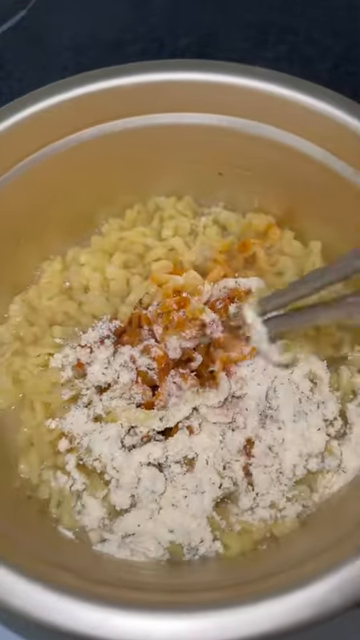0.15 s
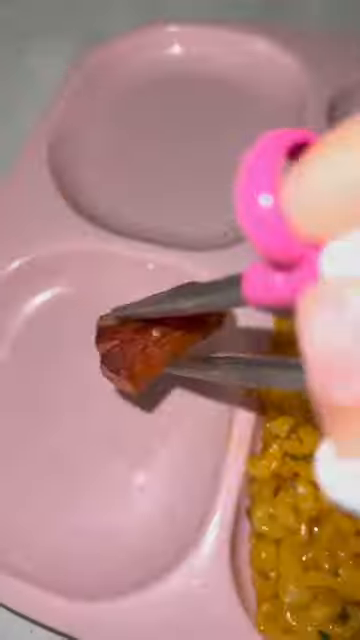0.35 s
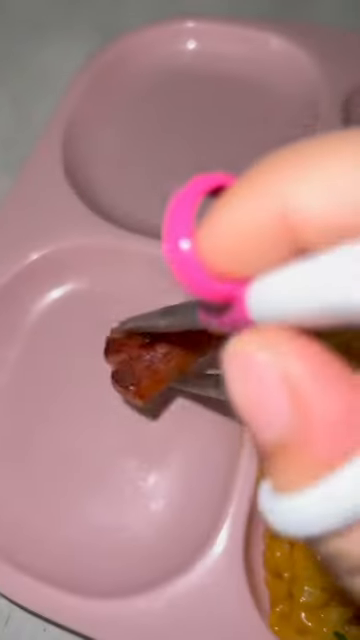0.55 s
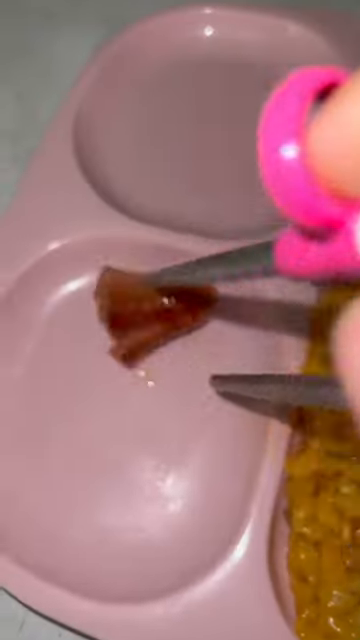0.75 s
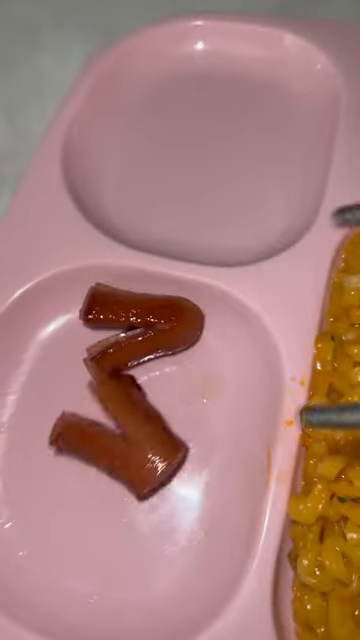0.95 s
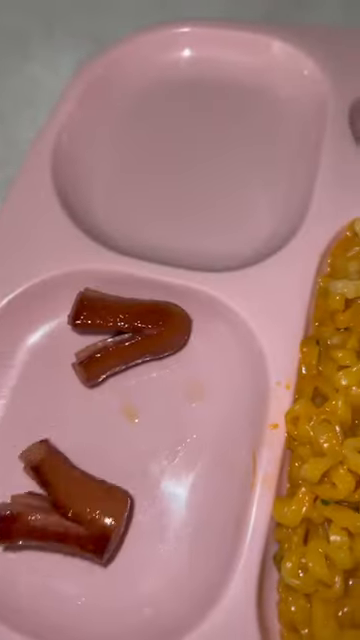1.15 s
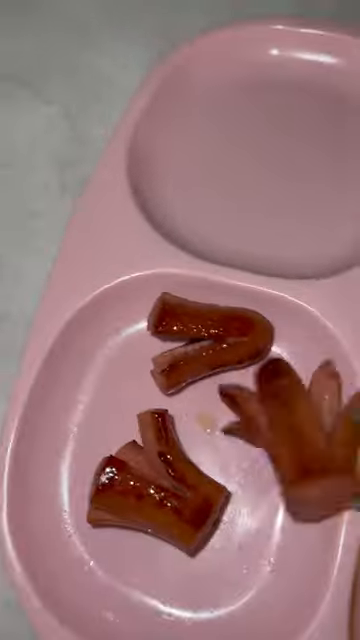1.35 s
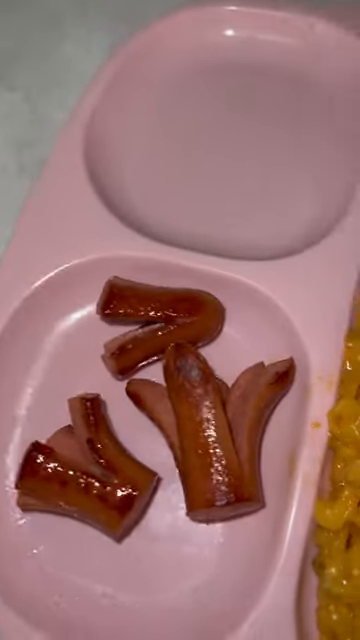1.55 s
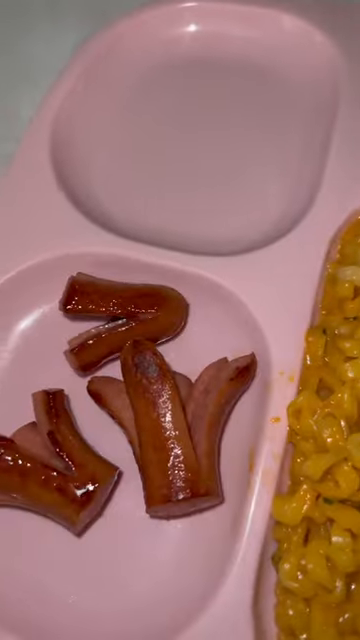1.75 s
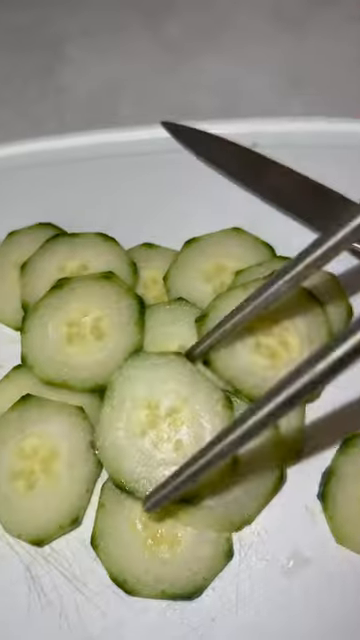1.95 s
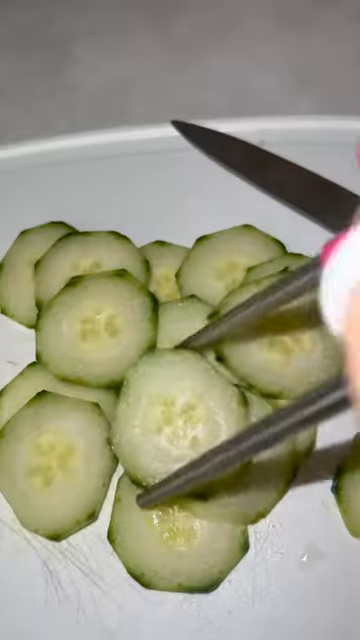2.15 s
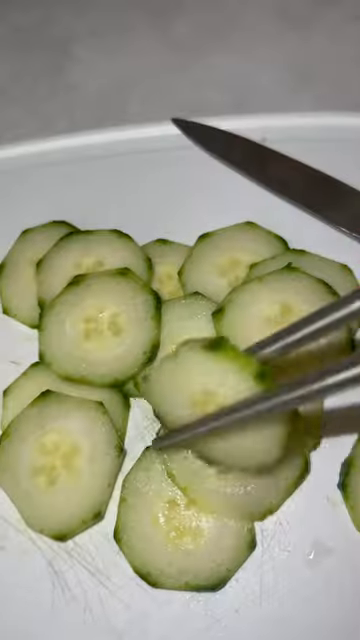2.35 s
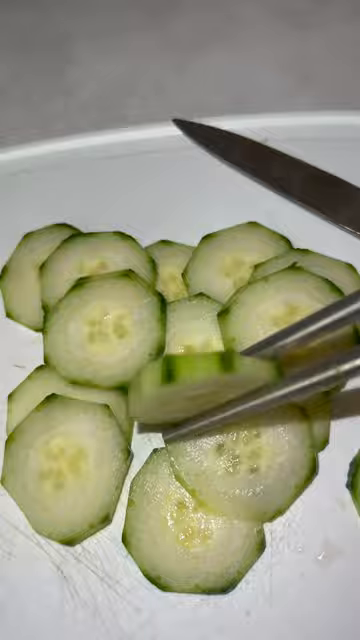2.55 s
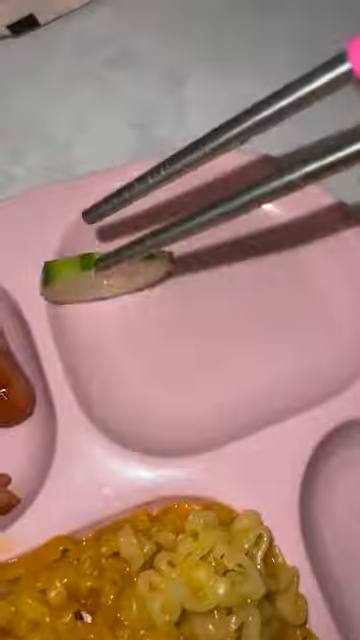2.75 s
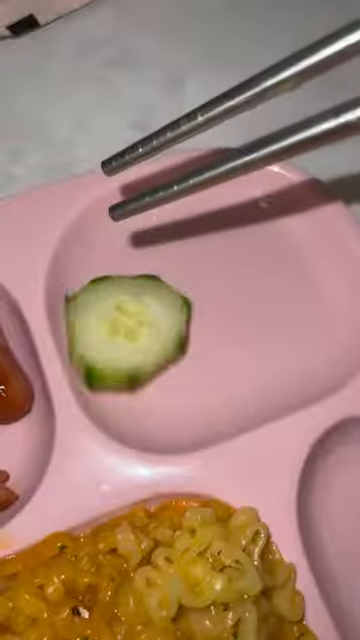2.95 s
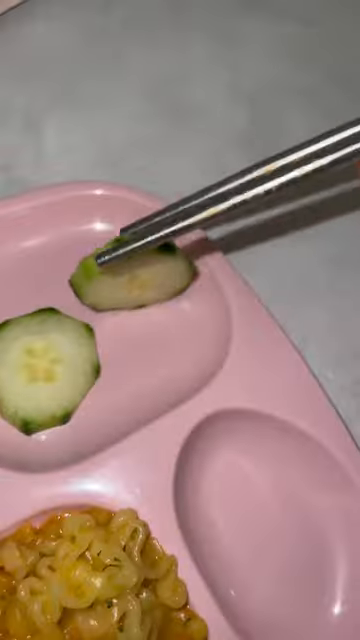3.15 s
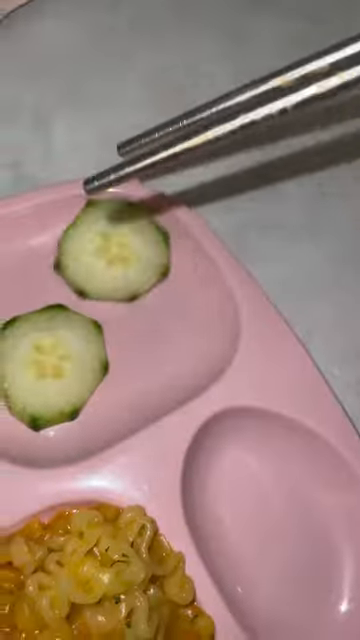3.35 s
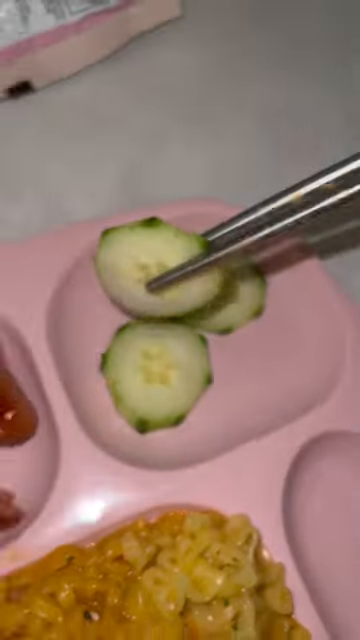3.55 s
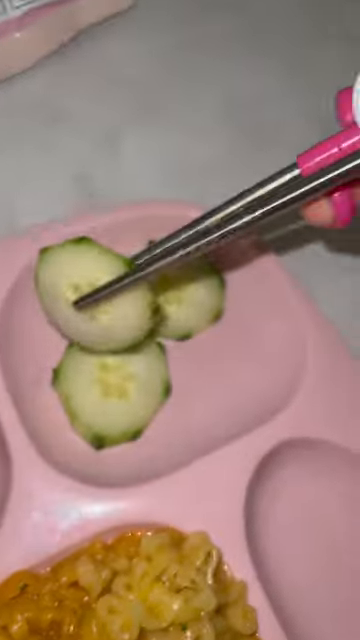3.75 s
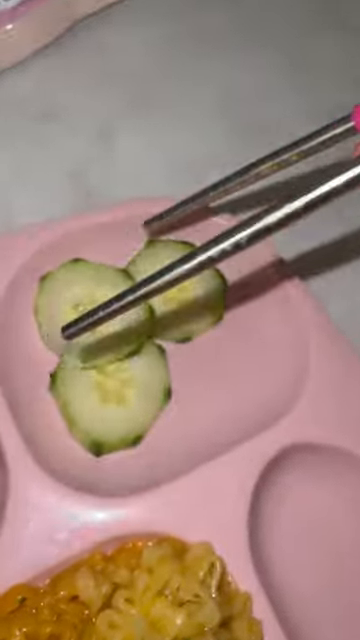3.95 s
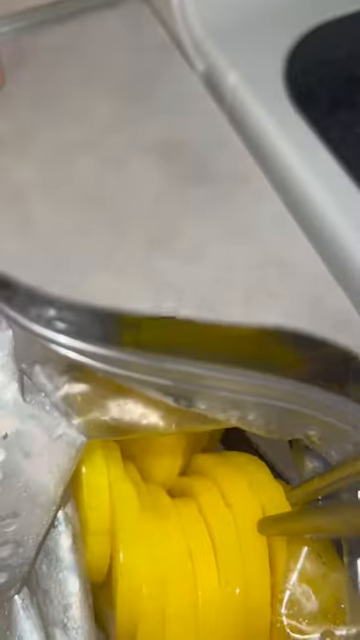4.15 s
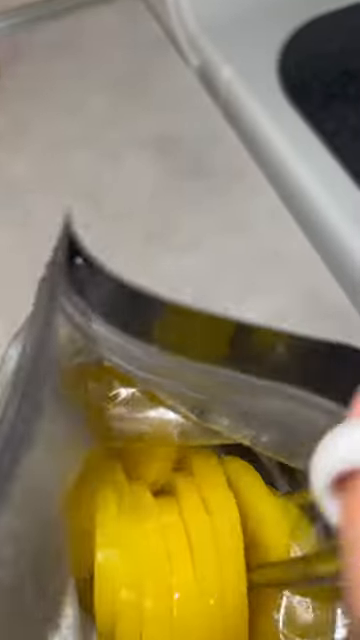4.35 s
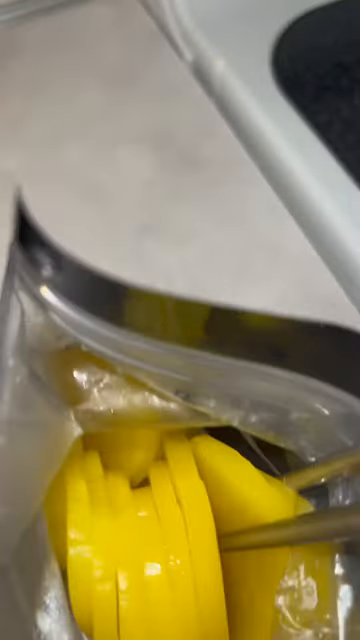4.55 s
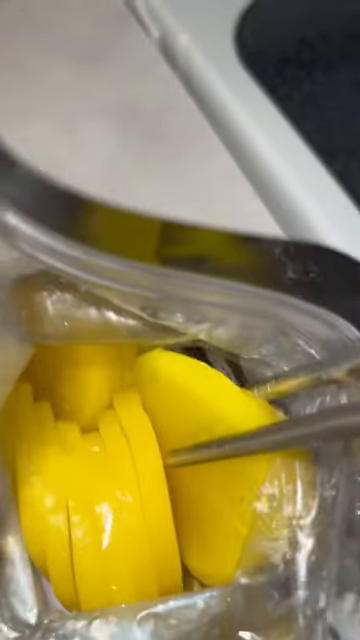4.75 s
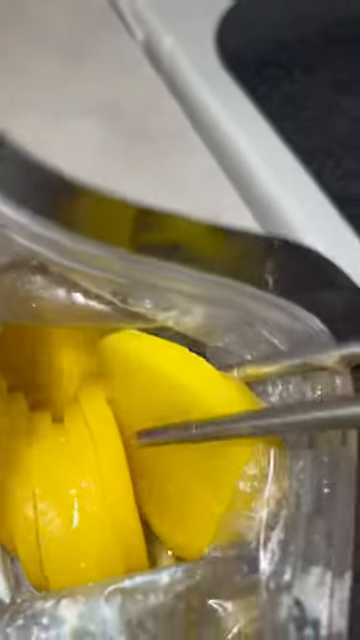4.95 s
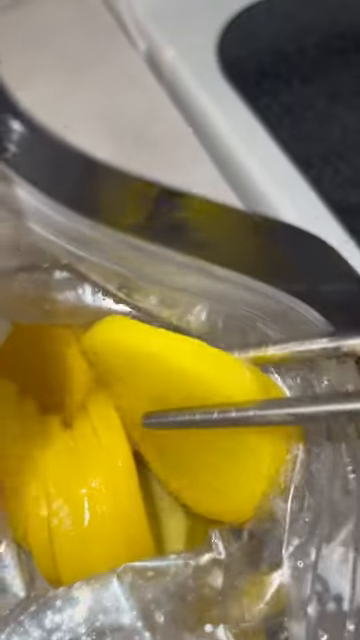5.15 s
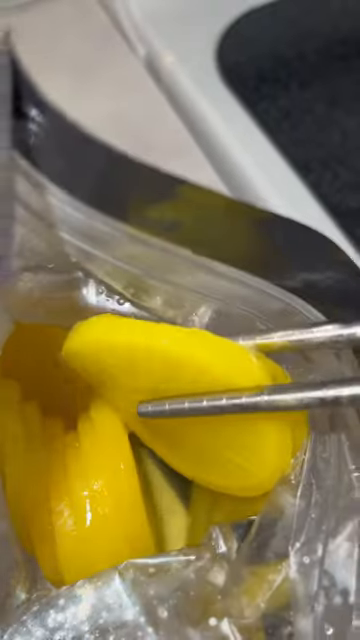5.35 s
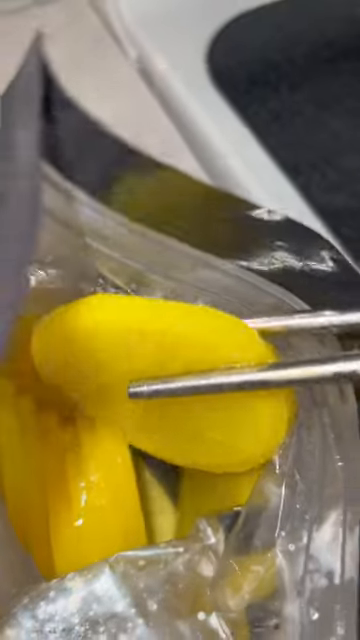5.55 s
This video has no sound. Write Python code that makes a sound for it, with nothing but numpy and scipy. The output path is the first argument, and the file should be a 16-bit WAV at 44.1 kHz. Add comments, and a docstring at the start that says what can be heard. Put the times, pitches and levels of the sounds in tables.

```python
"""A quiet home kitchen: food is plated close to the microphone, over a low rumble; an appliance hums at first.
Chopsticks, sausage and cucumber knock on a plastic tray (noise bursts through tray resonances), click wetly,
slide (smooth band noise) and thump the counter (decaying sines). Then the chopsticks dig pickled radish
out of a foil pouch: showers of foil clicks, single snaps, wet pops and low handling noise.
Hums are noise plus wavering sines; echoes and a diffuse tail make the room."""
import sys
import numpy as np
from scipy import signal
from scipy.fft import rfft, irfft, next_fast_len
from scipy.io import wavfile
from scipy.ndimage import uniform_filter1d

SR = 44100
rng = np.random.default_rng(int(sys.argv[2]) if len(sys.argv) > 2 else 0)


def pcm_store(signal):
    """Save signal as 16-bit PCM."""
    levels = np.round(np.clip(np.atleast_2d(signal), -1, 1) * 32767)
    wavfile.write(sys.argv[1], SR, levels.astype(np.int16).T)


N = 250929

# All event levels are relative, ahead of the mix gains in scene().
# Knocks on the tray. Each row: start in seconds, peak in dB, hardness as a tilt in dB per octave,
# delay of the bounce in seconds (0: lands dead).
KNOCKS = [(0.6363, -38, 1.5, .020), (0.7044, -48.5, 5.5, 0), (0.795, -50, 5.5, 0.026),
          (0.9765, -44, 7, 0.023), (1.0546, -53, 17, 0), (1.3485, -41, -5.5, .019),
          (2.7522, -56, -14, 0.00016), (2.856, -59.5, -12, 0.0002), (2.9856, -8.5, 2, .039),
          (3.168, -39.5, 5, .033), (3.3316, -44.5, -10.5, 0.00046), (3.3536, -24.5, -1.5, 0.0028),
          (3.3883, -45, -4, .011), (3.4165, -39.5, 7, .0095), (3.892, -37, -5, 0.003)]
# Clicks of chopsticks: mostly wet clicks into food; the rows at 0.6372 s and 3.892 s are steel tips striking
# the tray. # Each row: start in seconds, peak in dB, centre of the boosted pitch in Hz, t60 of the squish in
# seconds.
CLICKS = [(0.0109, -43.5, 6300, 0.13), (.2981, -52.5, 5800, 0.04), (0.4475, -44.5, 2380, 0.033),
          (0.6372, -39, 5150, 0.039), (1.3468, -36, 1720, 0.26), (2.3047, -29, 2270, 0.14),
          (2.3152, -32, 2000, 0.099), (2.348, -48.5, 1500, 0.11), (3.6163, -54, 2832, .06),
          (3.892, -38.5, 5940, .025), (4.1632, -52, 1760, 0.25)]
# Weight landing on the counter. Each row: start in seconds, peak in dB, pitch in Hz.
THUMPS = [(0.648, -37, 108.5), (1.362, -42.5, 81.7), (2.152, -48, 120), (2.321, -45.5, 165),
          (2.759, -43.5, 127.4), (3.003, -37.5, 118.4), (3.15, -38, 112), (3.173, -29.5, 109.1),
          (3.332, -46, 187), (3.356, -34, 132.4), (3.389, -44.5, 220), (3.42, -31.5, 115.8),
          (3.893, -40, 115.3), (4.263, -33, 100.4), (4.334, -35.5, 73), (4.916, -39.5, 100.3),
          (5.172, -39.5, 91), (5.265, -40, 66.2)]
# Large pouch folds snapping over. Each row: start in seconds, peak in dB.
SNAPS = [(4.2853, -8), (4.295, -18), (4.3215, -15), (4.3285, -14.5), (4.405, -20.5), (4.4943, -13),
         (4.5184, -21), (4.561, -17), (4.571, -11.5), (4.6824, -29), (4.7571, -8), (4.7603, -14.5),
         (4.7869, -13), (4.9, -26.5), (4.9136, -23), (5.048, -25.5), (5.1295, -24), (5.238, -35),
         (5.3946, -35.5), (5.668, -27.5)]
# Tray resonances. Each row: centre in Hz, nominal width in Hz, level in dB.
TRAY_MODES = [(280.5, 79, -19.5), (570, 50, -27), (949, 32, 0), (1006.5, 87, 3), (1290, 170, -10),
              (1520, 170, -9.5), (1760, 240, -17), (2174, 210, -9), (2700, 260, -16), (2975, 200, -28.5),
              (3755, 180, -28.5), (4500, 250, -35)]
# Soft noise swells: food and chopsticks sliding, the shortest being slices flopping over; the row at 2.262 s
# is only a faint hiss around a wet click. Each row: start in seconds, length in seconds, rms in dB,
# geometric centre in Hz, bandwidth in Hz.
SWELLS = [(0.547, 0.096, -74, 780, 150), (0.627, 0.06, -58.5, 1210, 1020), (0.869, 0.067, -75, 1550, 2050),
          (1.446, 0.081, -73.5, 2260, 3280), (1.94, 0.11, -71, 570, 184), (2.262, 0.14, -72, 2800, 6150),
          (2.388, 0.077, -75, 2440, 4030), (3.152, 0.092, -58, 583, 120), (3.329, 0.013, -49.5, 730, 670),
          (3.347, 0.03, -41.5, 530, 540), (3.387, 0.022, -45.5, 660, 535), (3.413, 0.025, -45.5, 730, 760)]
# Steel chopsticks touching and ringing. Each row: start in seconds, initial amplitude in dB, pitch in Hz,
# t60 in seconds.
TINKS = [(0.0094, -34.5, 5960, 0.009), (0.2986, -41, 5970, 0.0057), (0.448, -60, 2550, 0.032),
         (3.6129, -50.5, 2854, 0.021)]
# Wet radish slices smacking apart. Each row: start in seconds, peak in dB, pitch in Hz.
SMACKS = [(4.2499, -23.5, 1290), (4.49, -26.5, 2340), (4.7322, -32.5, 1700), (4.7938, -31, 1850),
          (4.9251, -25, 1390), (5.44, -40, 1580), (5.511, -34, 1580), (5.5749, -39.5, 1910)]
# Pushes of the chopsticks into the pouch. Each row: start in seconds, attack in seconds, hold in seconds,
# release t60 in seconds, effort in dB, rubbing on dry foil in dB re effort.
PUSHES = [(4.197, 0.052, 0.055, 0.31, -35, -4), (4.473, 0.045, 0.078, 0.31, -41, -12),
          (4.67, 0.05, 0.065, 0.31, -47, -4), (4.896, 0.0097, 0.012, .17, -46.5, -6),
          (4.963, 0.19, 0.033, 0.1, -44, -2), (5.23, 0.0052, 0.0027, 0.038, -42.5, -0.5),
          (5.384, 0.069, 0.13, .25, -61, -26), (5.641, 0.0055, 0.065, .2, -39, 1)]
# Spectra of contact ticks, squish, foil and pouch handling. Each row: frequency in Hz, level in dB.
TICK_SPECTRUM = [(500, -12.5), (2000, -1.5), (4000, 2), (6000, -8.5), (8000, -2), (11000, -9), (16000, -25)]
SQUISH_SPECTRUM = [(150, -13), (300, 5), (700, -7), (1000, -2), (1700, -8.5), (2600, -7.5), (4200, -12.5),
                   (7000, -12.5), (12000, -7.5), (16000, -24)]
FOIL_SPECTRUM = [(100, -36), (300, 2), (600, -4.5), (900, -4.5), (1500, 1.5), (2200, -0.5), (3900, -3.5),
                 (5700, -2), (9000, -4.5), (11500, -5.5), (14500, -11.5), (16500, -9)]
HANDLING_SPECTRUM = [(15, -42), (25, -15.5), (43, 6.5), (64, 6), (140, -2), (259, -4), (297, -10.5),
                     (533, -21.5), (900, -22), (1170, -27), (1980, -120)]
# Spectra of room rumble, fan air and whir air. Each row: frequency in Hz, level in dB.
RUMBLE_SPECTRUM = [(12, -38.5), (20, -29.5), (45, 0.5), (71, -4), (121, -6.5), (169, -29), (332, -24.5),
                   (420, -32.5), (566, -44), (794, -47), (939, -41), (1600, -48.5), (2810, -50.5),
                   (8170, -58.5), (12000, -62.5), (16500, -88.5)]
FAN_SPECTRUM = [(59, -30), (100, -22.5), (129, -5), (200, -13), (399, -14), (513, -20), (558, -15.5),
                (733, -28), (2320, -42.5), (3050, -48), (5370, -47.5), (11400, -64.5), (15000, -79)]
WHIR_SPECTRUM = [(150, 6.5), (280, -1.5), (350, 8), (500, -15.5), (800, -22.5), (1500, -33.5), (3200, -35),
                 (4500, -18.5), (6500, -31.5), (8200, -25.5), (10000, -48)]
# Hum lines of the fan and of a second, fainter whir. Each row: frequency in Hz, rms in dB before the gain below.
FAN_LINES = [(122, -51.5), (275, -65.5), (402, -61), (560, -59.5)]
WHIR_LINES = [(335, -55.5)]
# Gain of each hum over time. Each row: time in seconds, gain in dB.
FAN_GAIN = [(0, 0), (.345, 0), (.36, -58.5)]
WHIR_GAIN = [(.34, -39), (.36, -19), (.52, -14), (.58, -6), (.84, -4), (.88, -8.5), (.92, -50), (1.0, -63)]
# Decay of the kitchen tail. Each row: frequency in Hz, t60 in seconds.
KITCHEN_T60 = [(120, 1), (500, 0.65), (1200, 0.25), (3000, 0.47), (8000, 0.47), (16000, 0.1)]
# Initial colour of the kitchen tail. Each row: frequency in Hz, level in dB.
KITCHEN_SPECTRUM = [(100, -6.5), (500, 10.5), (1000, 7.5), (1500, 6), (2300, 4), (3200, 7.5), (5000, 3),
                    (16000, -4.5)]
# Reflections from counter and cupboards. Each row: delay in seconds, linear gain.
ECHOES = [(.0024, 0.085), (.0075, .07), (0.0129, 0.046), (0.0148, 0.035), (.0255, .075), (.030, 0.057)]

# a bounce moves this share of the way to the elastic level, and comes back sharper
ELASTIC_DB, BOUNCE_SHARE, BOUNCE_TILT_DB_PER_OCT = -54, .4, 2.5
# light skitter as the chopsticks let go of the sausage
SKITTER_START_S, SKITTER_END_S, SKITTER_DB, SKITTER_HARDNESS_DB_PER_OCT = 0.9, .95, -64.5, -2
GRIP_DB = -13.5  # a push catches this far below full effort, then builds
# the pouch rocks after each push: lag, dB of rumble per dB of effort, level where both are equal
ROCK_LAG_S, ROCK_DB_PER_DB, ROCK_DB = 0.0085, 0.78, -46.5
# a stronger snap is brighter: tilt in dB per octave per dB; at the plain level it has the foil's own colour
SNAP_TILT_PER_DB, SNAP_PLAIN_DB = 0.38, -17
RUMBLE_DB = -55.5
LOW_CUT_HZ, EDGE_HZ = 40.5, 16400


def amp(db):
    """Decibels to gain."""
    return 10 ** (np.asarray(db) / 20)


def unit(x):
    """Scales to rms 1."""
    return x / np.sqrt(np.mean(x ** 2) + 1e-20)


def peaked(x):
    """Scales to peak 1."""
    return x / (abs(x).max() + 1e-20)


def read(points, hz):
    """Interpolates a table on a log-frequency axis."""
    f, value = np.transpose(points)
    return np.interp(np.log(hz + 1), np.log(f + 1), value)


def follow(rows):
    """Turns rows (s, dB, ..) into one gain curve per dB column."""
    s, *columns = np.transpose(rows)
    return [amp(np.interp(np.arange(N) / SR, s, c)) for c in columns]


def add(mix, s, sound):
    """Mixes a sound in at time s."""
    part = mix[..., max(round(s * SR), 0):][..., :sound.shape[-1]]
    part += sound[..., :part.shape[-1]]


def noise(spectrum):
    """Gaussian noise coloured in the frequency domain, rms 1."""
    n = next_fast_len(N)
    white = rfft(rng.standard_normal(n))
    gain = amp(read(spectrum, np.fft.rfftfreq(n, 1 / SR)))
    return unit(irfft(white * gain, n)[:N])


def impulse(gain_db):
    """Minimum phase: the sharpest causal click with this spectrum."""
    log_gain = np.log(amp(np.r_[gain_db, gain_db[-2:0:-1]]))
    return np.fft.ifft(np.exp(np.conj(signal.hilbert(log_gain)))).real


def ports(x, right_db, delay=2):
    """Two microphone ports: the left hears the signal or pair some samples later; right_db sets the balance."""
    left, right = np.broadcast_to(x, (2, x.shape[-1]))
    late = np.r_[np.zeros(delay), left[:-delay]]
    return np.array([late / amp(right_db / 2), right * amp(right_db / 2)])


def sway(hz):
    """Slow random wander of rms 1, with hz fresh values a second."""
    t = np.arange(N) / SR
    return unit(np.interp(t * hz, np.arange(512), rng.standard_normal(size=512)))


def burst(t, t60_s, spill):
    """A sharp edge and the dying scatter of micro-contacts after it."""
    scatter = rng.standard_normal(len(t)) * amp(-60 * t / t60_s)
    return (t == 0) + spill * scatter / np.linalg.norm(scatter)


def shower(per_s, spread_db):
    """Clicks at random moments, most faint, a few loud."""
    where, size = rng.random(size=(4096, 2))[:round(per_s * N / SR)].T
    train = np.zeros(N)
    train[(where * N).astype(int)] = amp(spread_db * np.minimum(-np.log(size), 2.5))
    return train


def contacts(count=6):
    """Every tray touch as (s, peak dB, hardness): knocks, their bounces and the skitter."""
    touches = [(s, db, hardness) for s, db, hardness, gap_s in KNOCKS]
    for s, db, hardness, gap_s in KNOCKS:
        if gap_s > 0:
            bounce_db = db - BOUNCE_SHARE * (db - ELASTIC_DB)
            touches.append((s + gap_s, bounce_db, hardness + BOUNCE_TILT_DB_PER_OCT))
    steps = (np.arange(count) + rng.random(size=count)) / count
    for s in SKITTER_START_S + (SKITTER_END_S - SKITTER_START_S) * steps:
        touches.append((s, SKITTER_DB, SKITTER_HARDNESS_DB_PER_OCT))
    return touches


def tray(tick_db=-19, tick_per_tilt=0.4, strike_db=2.6, scatter_db=0.5, chatter_t60_s=0.017, chatter=0.46,
         rise_s=0.0032, dull_hz=3700, lean_hz=580):
    """Knocks chatter on the tray, whose modes share each one at random; harder contacts tick more."""
    out, t, hz = np.zeros(N), np.arange(SR // 5) / SR, np.fft.rfftfreq(4096, 1 / SR)
    octaves = np.log2(np.clip(hz, 300, 4000) / 1000)
    skirts_db = -10 * np.log10((1 + (hz / dull_hz) ** 6) * (1 + (lean_hz / (hz + 1)) ** 4))
    for s, db, hardness in contacts():
        shares = amp(strike_db * rng.standard_normal(len(TRAY_MODES)))  # where it lands
        power = 0
        for share, (f, width, level) in zip(shares, TRAY_MODES):
            power = power + (share * amp(level)) ** 2 / (1 + (2 * (hz - f) / width) ** 2) ** 0.86
        # the many weaker modes
        ripple_db = scatter_db * unit(uniform_filter1d(rng.standard_normal(len(hz)), size=7))
        body = impulse(10 * np.log10(power) + skirts_db + hardness * octaves + ripple_db)
        ring = signal.fftconvolve(burst(t, chatter_t60_s, chatter), body)[:len(t)]
        ring = peaked(ring * (1 - np.exp(-t / rise_s)))
        tick_burst = burst(t, t60_s=0.022, spill=4.5)
        tick = peaked(signal.fftconvolve(tick_burst, impulse(read(TICK_SPECTRUM, hz)))[:len(t)])
        add(out, s, amp(db) * (ring + amp(tick_db + tick_per_tilt * hardness) * tick))
    return out


def food(ring_db=7, ring_octaves=0.74, spill=1.5):
    """Chopstick clicks, mostly into moist food: two noise bursts through a squish spectrum boosted at one
    pitch."""
    out, t, hz = np.zeros(N), np.arange(SR // 4) / SR, np.fft.rfftfreq(1024, 1 / SR)
    for s, db, pitch_hz, t60_s in CLICKS:
        boost_db = ring_db * np.exp(-(np.log2((hz + 1) / pitch_hz) / ring_octaves) ** 2)
        contact = burst(t, t60_s, spill) + burst(t, t60_s=0.02, spill=2.5)
        click = signal.fftconvolve(contact, impulse(read(SQUISH_SPECTRUM, hz) + boost_db))
        add(out, s, amp(db) * peaked(click))
    return out


def steel():
    """Thin steel rods ring briefly on one bending mode."""
    out, t = np.zeros(N), np.arange(SR // 8) / SR
    for s, db, hz, t60_s in TINKS:
        add(out, s, amp(db - 60 * t / t60_s) * np.sin(2 * np.pi * hz * t))
    return out


def swells():
    """Smooth band-passed noise that swells and fades."""
    out = np.zeros(N)
    for s, length_s, db, hz, width_hz in SWELLS:
        low_hz = np.hypot(hz, width_hz / 2) - width_hz / 2
        band = signal.butter(2, [low_hz, low_hz + width_hz], "band", fs=SR, output="sos")
        hiss = signal.sosfilt(band, rng.standard_normal(SR // 4))[:round(length_s * SR)]
        u = np.linspace(0, 1, len(hiss))
        add(out, s, amp(db) * unit(hiss * np.sqrt(u) * (1 - u)))
    return out


def counter(t60_s=0.25, rise_s=0.0016, low_db=-9, low_ratio=.55, high_db=-13, high_ratio=2.4, high_t60_s=0.14):
    """The counter booms under each landing weight: three decaying partials."""
    out, t = np.zeros(N), np.arange(SR // 2) / SR
    for s, db, hz in THUMPS:
        turn = 2 * np.pi * hz * t
        boom = (np.sin(turn) + amp(low_db) * np.sin(low_ratio * turn)) * amp(-60 * t / t60_s)
        boom += np.sin(high_ratio * turn) * amp(high_db - 60 * t / high_t60_s)
        add(out, s, amp(db) * peaked(boom * (1 - np.exp(-t / rise_s))))
    return out


def facet(tilt_db, t60_s, spill, uneven_db=4.0, port_db=6.5, knee_hz=1900, thin=0.28):
    """One foil facet buckles: a click with its own resonances, a little different at each port."""
    hz, knots_hz = np.fft.rfftfreq(1024, 1 / SR), np.geomspace(400, 16000, num=24)
    octaves = np.log2(np.maximum(hz, knots_hz[0]) / knee_hz)
    # dull folds gather round the knee
    colour_db = read(FOIL_SPECTRUM, hz) + tilt_db * np.maximum(octaves, -thin * octaves)
    shared_db = uneven_db * rng.standard_normal(len(knots_hz))
    bumps_db = shared_db + port_db * rng.standard_normal((2, len(knots_hz)))
    click = burst(np.arange(SR // 20) / SR, t60_s, spill)
    return np.array([signal.fftconvolve(click, impulse(colour_db + np.interp(hz, knots_hz, bumps)))
                     for bumps in bumps_db])


def snaps(t60_s=0.023, right_db=1.2, uneven_db=1.5, port_db=4.0):
    """Large folds snap over one by one, the strong ones brightest."""
    out = np.zeros((2, N))
    for s, db in SNAPS:
        tilt_db = SNAP_TILT_PER_DB * (db - SNAP_PLAIN_DB)
        snap = peaked(facet(tilt_db, t60_s, spill=2.6, uneven_db=uneven_db, port_db=port_db))
        add(out, s, amp(db) * ports(snap, right_db, delay=1))
    return out


def crackle(per_s, spread_db, tilt_db, t60_s, uneven_db, count=16):
    """Small facets buckle at random: a pool of clicks, each with its own colour and one of two port delays."""
    out = np.zeros((2, N))
    for k in range(count):
        grain = unit(facet(tilt_db, t60_s, spill=2.14, uneven_db=uneven_db))
        grain = ports(grain, 0, delay=1 + k % 2)[:, :SR // 50]
        out += signal.oaconvolve(shower(per_s / count, spread_db)[None], grain, axes=1)[:, :N]
    return unit(out)


def pushes(catch_db=1.5, catch_hz=55):
    """Chopstick effort and its rub on dry foil: each push catches, builds, holds and lets go."""
    t, effort, rub = np.arange(N) / SR, np.zeros(N), np.zeros(N)
    for start, attack, hold, release, db, dry_db in PUSHES:
        building_db = GRIP_DB * np.clip(1 - (t - start) / attack, 0, 1)
        fading_db = -60 * np.maximum(t - start - attack - hold, 0) / release
        push = (t >= start) * amp(db + building_db + fading_db)
        effort += push
        rub += amp(dry_db) * push
    catching = amp(catch_db * sway(catch_hz))  # foil sticks and gives, so creases come in clumps
    return effort * catching, rub


def pouch(crease_db=-8.5, pop_db=-5, fizz_db=-3.5, handling_db=-1, crease_tilt_db=-6, fizz_tilt_db=0):
    """Stirring creases the foil, parts wet slices, rubs the foil to a fizz and jostles the pouch on the counter."""
    effort, rub = pushes()
    keep = np.exp(-1 / (ROCK_LAG_S * SR))
    lagged = signal.lfilter([1 - keep], [1, -keep], effort)
    jostle = amp(ROCK_DB) * (lagged / amp(ROCK_DB)) ** ROCK_DB_PER_DB
    creases = crackle(per_s=520, spread_db=6, tilt_db=crease_tilt_db, t60_s=.012, uneven_db=5.5)
    fizz = crackle(per_s=2800, spread_db=6, tilt_db=fizz_tilt_db, t60_s=.012, uneven_db=2)
    brine = amp(pop_db) * ports(pops(), 0)
    stirring = effort * (amp(crease_db) * creases + brine)
    handling = ports(amp(handling_db) * jostle * noise(HANDLING_SPECTRUM), 0)
    return stirring + amp(fizz_db) * rub * fizz + handling


def pop(hz, cycles=2.15, sag=0.28):
    """A film of brine breaks: a tiny decaying sine that sags in pitch."""
    fading = np.exp(-hz * np.arange(SR // 60) / SR / cycles)
    return np.sin(2 * np.pi * np.cumsum(hz * (1 + sag * fading)) / SR) * fading


def pops(low_hz=800, high_hz=3200, spread_db=5, count=14):
    """Small pops of brine at random between the slices."""
    out = np.zeros(N)
    for hz in np.geomspace(low_hz, high_hz, count):
        out += signal.oaconvolve(shower(120 / count, spread_db), np.sqrt(hz) * pop(hz))[:N]
    return unit(out)


def smacks(t60_s=0.022, spill=2.1):
    """Two wet slices part in a quick flurry of pops."""
    out, t = np.zeros(N), np.arange(SR // 20) / SR
    for s, db, hz in SMACKS:
        flurry = signal.fftconvolve(burst(t, t60_s, spill), pop(hz, cycles=0.55))
        add(out, s, amp(db) * peaked(flurry))
    return out


def appliance(spectrum, db, lines, gain_rows, waver=0.0028, flutter=0.12):
    """Rushing air and a few motor lines that waver in pitch and level."""
    hum = np.zeros(N)
    for hz, line_db in lines:
        level = amp(line_db) * np.sqrt(2) * (1 + flutter * sway(10))
        phase = 2 * np.pi * np.cumsum(hz * (1 + waver * sway(4.2))) / SR
        hum += level * np.sin(phase)
    return follow(gain_rows)[0] * (air(spectrum, db) + hum)


def air(spectrum, db, apart_db=-15, diffuse_hz=350):
    """Steady noise: alike at both ports in the bass, diffuse above."""
    high_pass = signal.butter(1, diffuse_hz, "high", fs=SR)
    side = signal.lfilter(*high_pass, noise(spectrum)) * 0.94 + amp(apart_db) * noise(spectrum)
    return amp(db) * (noise(spectrum) + side * np.array([[1], [-1]]))


def kitchen(x, wet_db):
    """A few near reflections and a diffuse noise tail with its own decay time in each band."""
    hz, t, z = signal.stft(rng.standard_normal((2, SR // 2)), SR, nperseg=256)
    fading_db = read(KITCHEN_SPECTRUM, hz)[:, None] - 60 * t / read(KITCHEN_T60, hz)[:, None]
    onset = 1 - np.exp(-t / 0.0051)
    tail = signal.istft(z * amp(fading_db) * onset, SR, nperseg=256)[1]
    tail *= amp(wet_db) / np.linalg.norm(tail[0])
    for s, gain in ECHOES:
        tail[[0, 1], round(s * SR) + rng.integers(0, 8, size=2)] += gain
    return x + signal.fftconvolve(x, tail, axes=1)[:, :N]


def scene():
    """Tray, food and pouch in the kitchen, over rumble and hum."""
    plating = ports(tray(), right_db=4.2)
    plating += ports(amp(-2.0) * swells(), right_db=-1.5)
    plating += ports(amp(1.0) * counter(), right_db=-1.0)
    wet_and_steel = amp(5.5) * food() + steel() + amp(-0.5) * smacks()
    handling = ports(wet_and_steel, right_db=1.5) + amp(-2.5) * snaps() + pouch()
    hums = appliance(FAN_SPECTRUM, db=-51.0, lines=FAN_LINES, gain_rows=FAN_GAIN)
    hums += appliance(WHIR_SPECTRUM, db=-49, lines=WHIR_LINES, gain_rows=WHIR_GAIN)
    rumble = air(RUMBLE_SPECTRUM, RUMBLE_DB, apart_db=-30)
    return kitchen(plating, wet_db=-21.5) + kitchen(handling, wet_db=-20.0) + hums + rumble


def record(dry):
    """Low cut and band limit of the microphone chain."""
    low_cut = signal.butter(2, LOW_CUT_HZ, "high", fs=SR, output="sos")
    band_limit = signal.firwin(511, EDGE_HZ, window=("kaiser", 9), fs=SR)
    return signal.oaconvolve(signal.sosfilt(low_cut, dry), band_limit[None], "same")


dry = scene()
out = record(dry)
pcm_store(out)
```